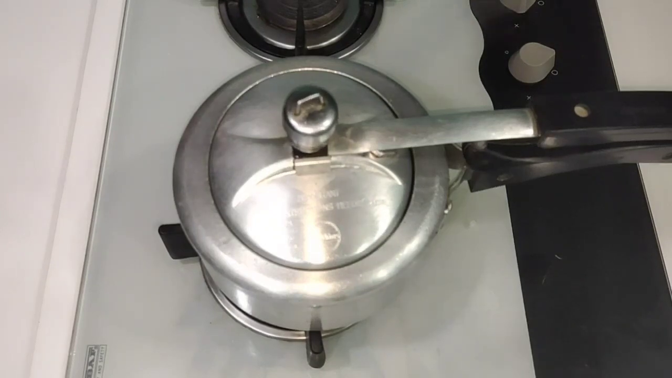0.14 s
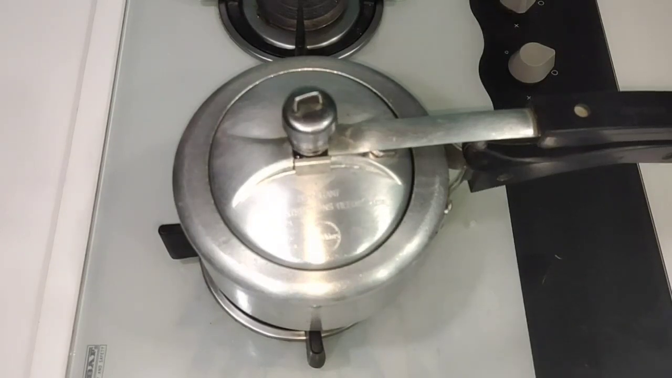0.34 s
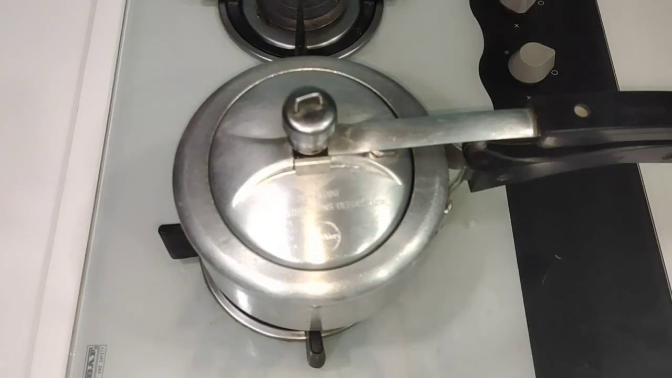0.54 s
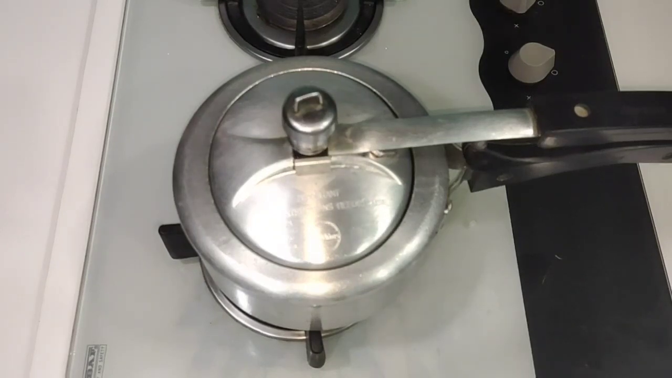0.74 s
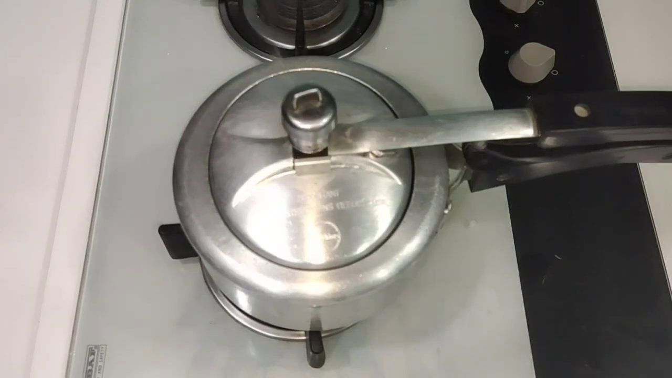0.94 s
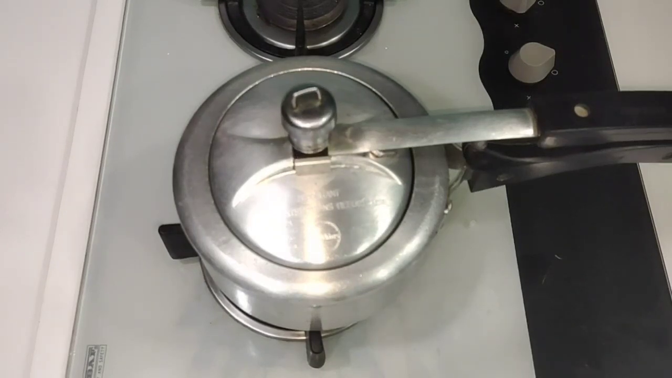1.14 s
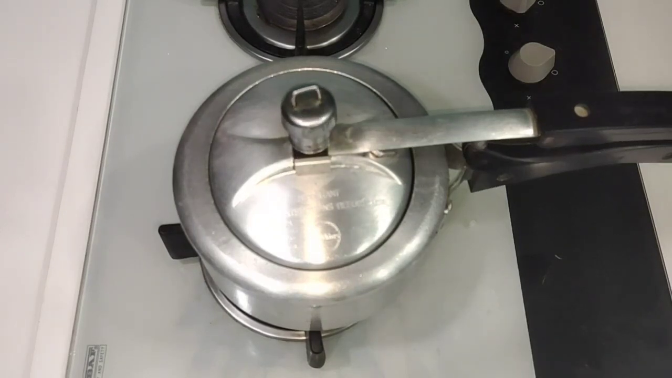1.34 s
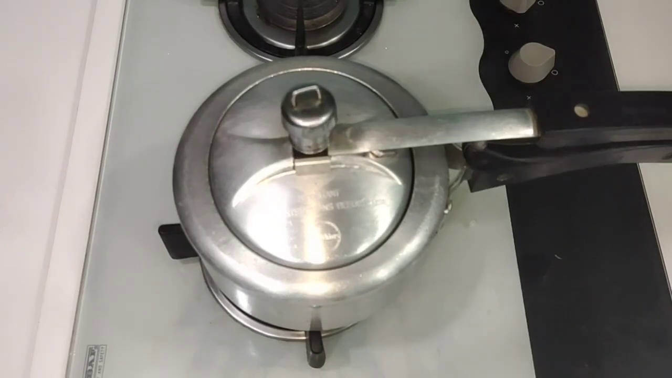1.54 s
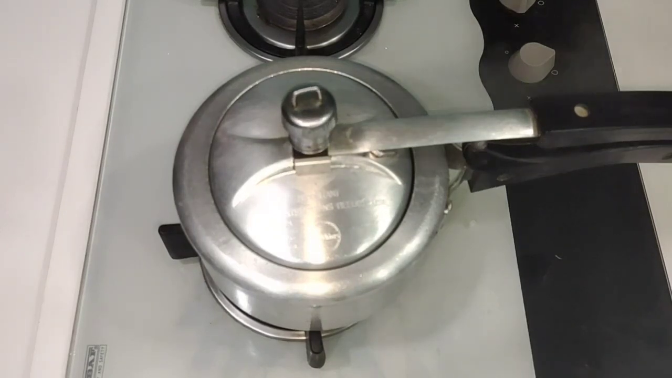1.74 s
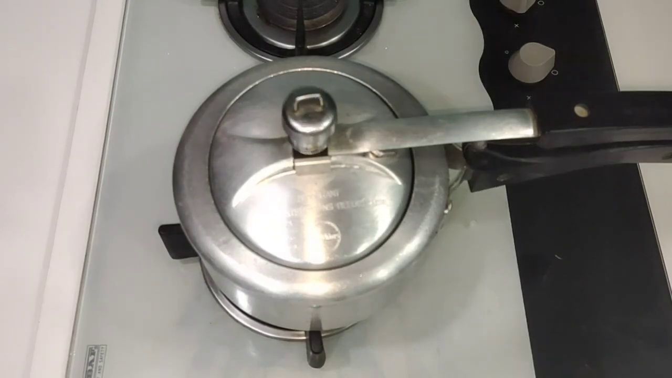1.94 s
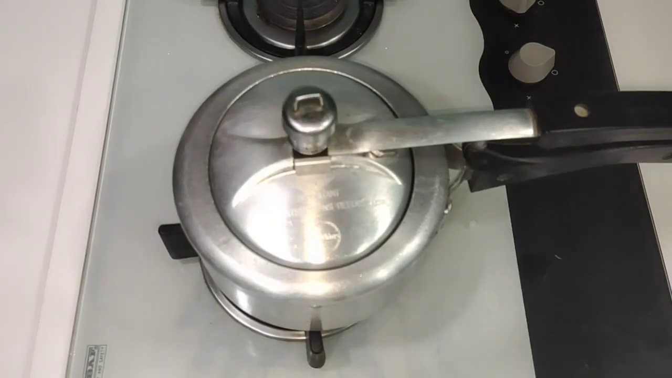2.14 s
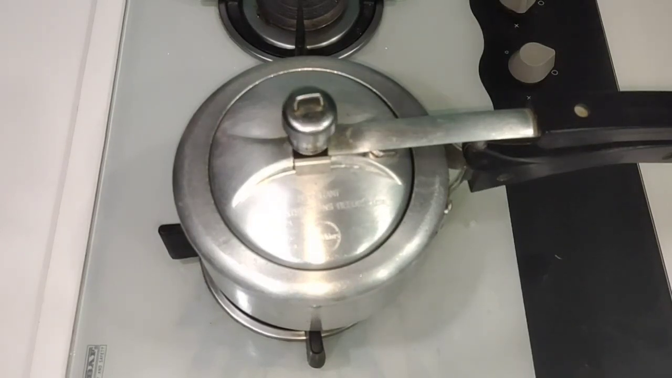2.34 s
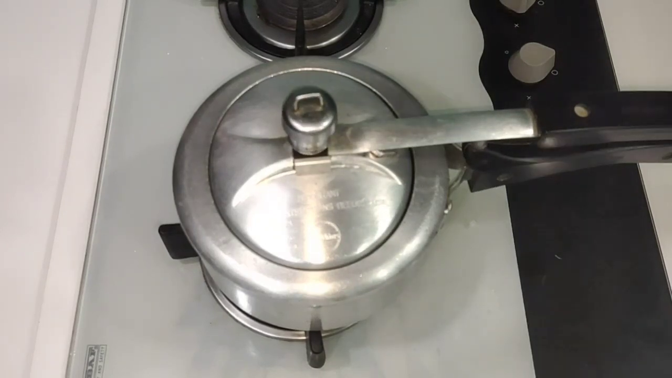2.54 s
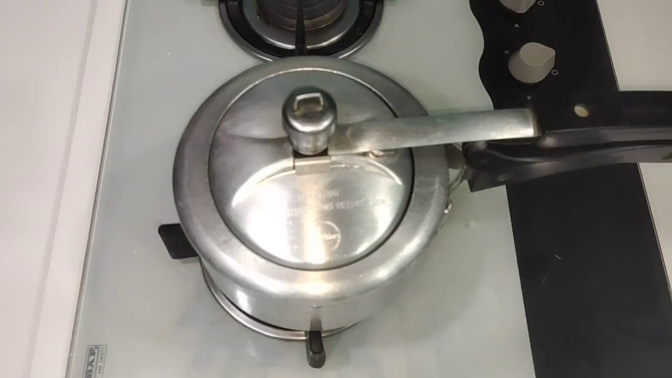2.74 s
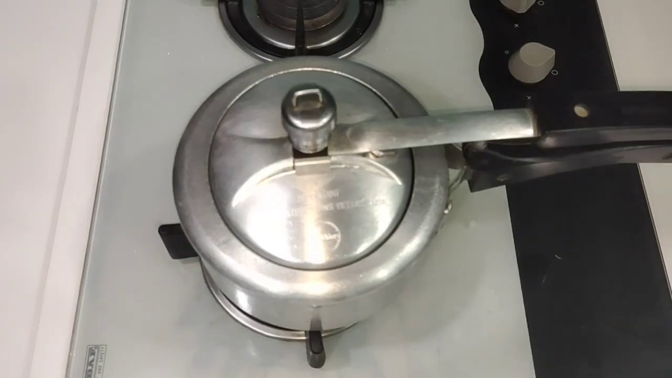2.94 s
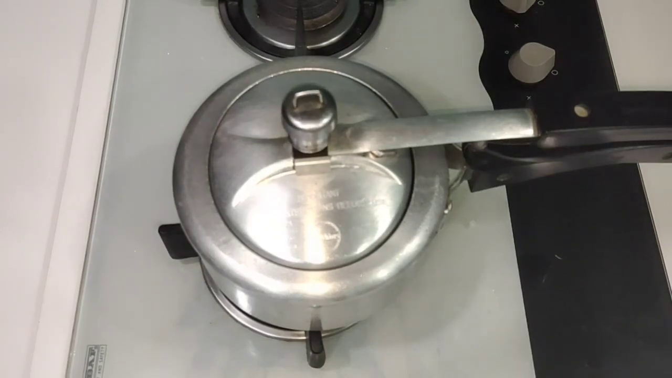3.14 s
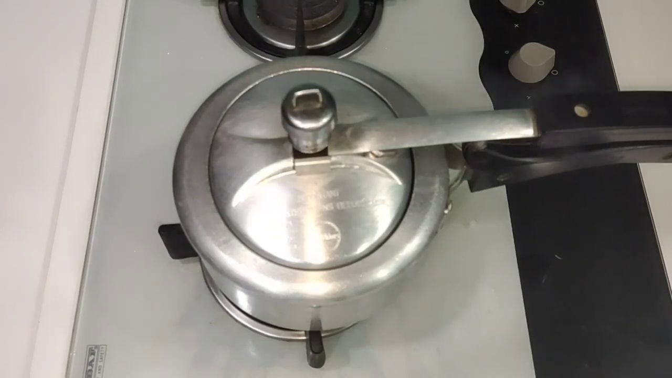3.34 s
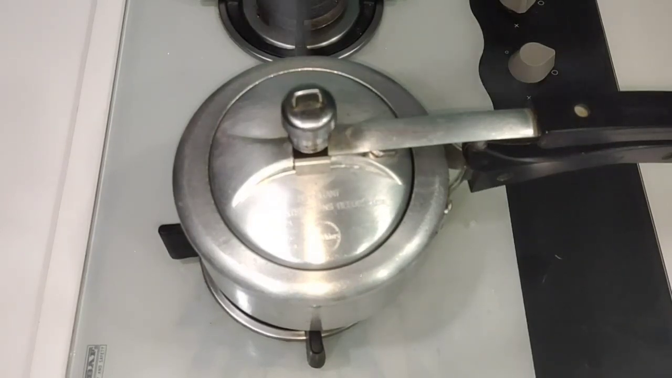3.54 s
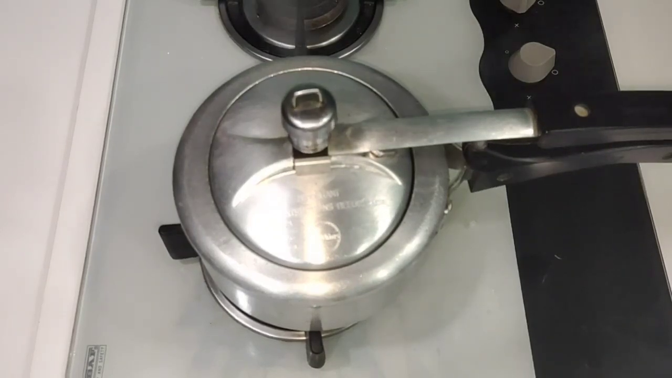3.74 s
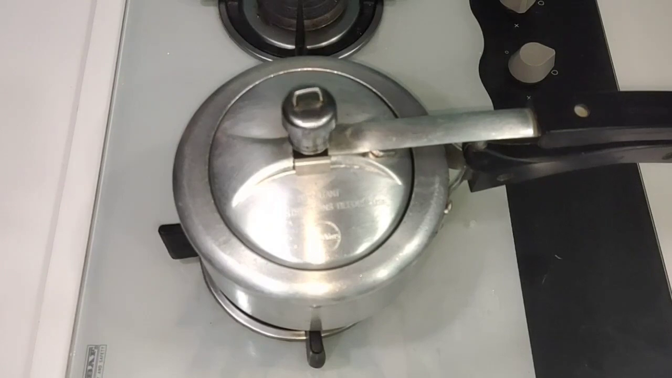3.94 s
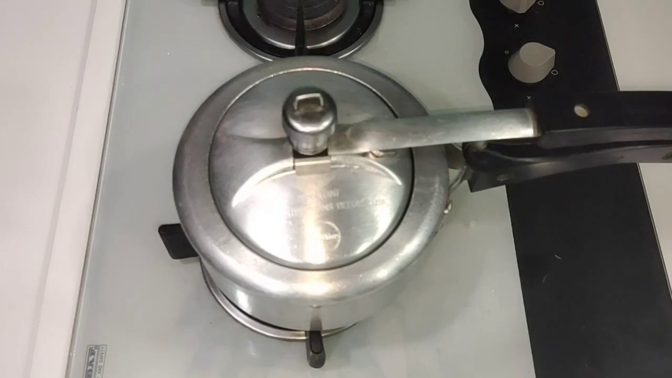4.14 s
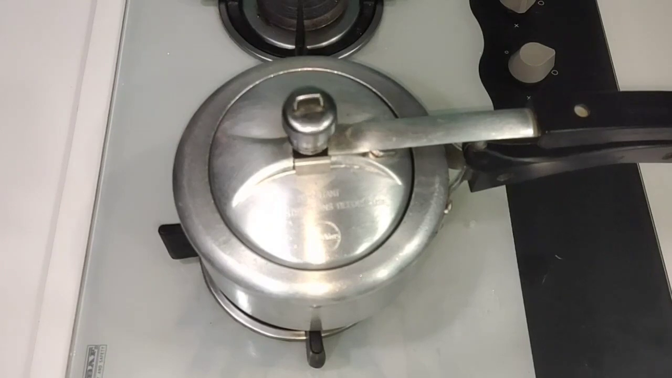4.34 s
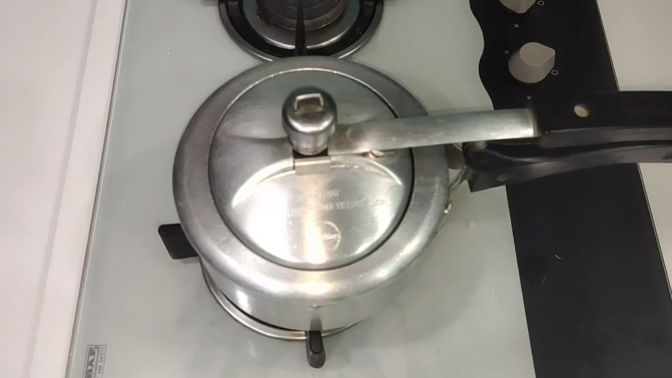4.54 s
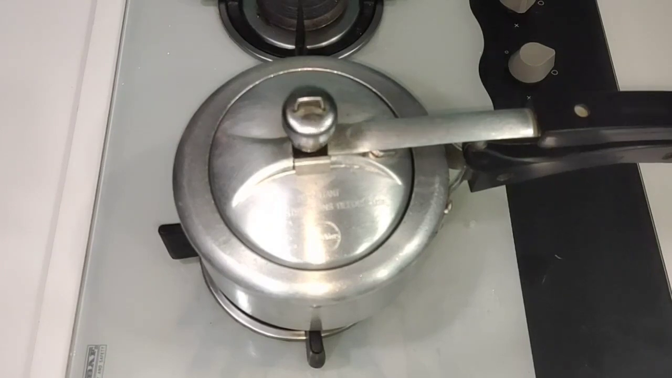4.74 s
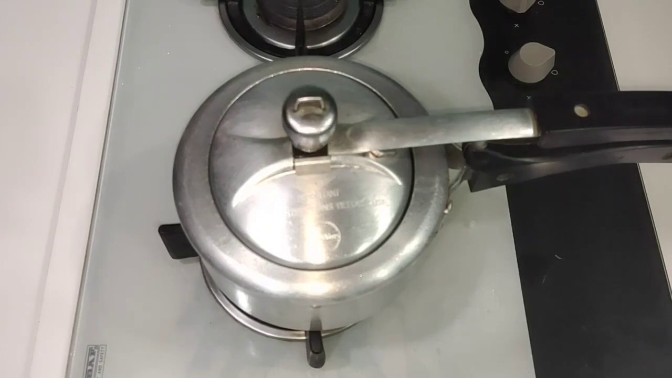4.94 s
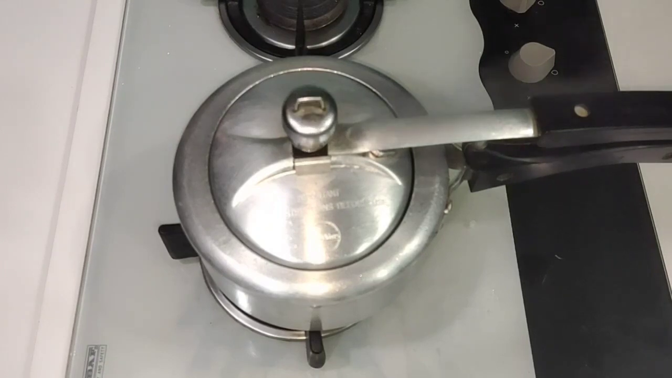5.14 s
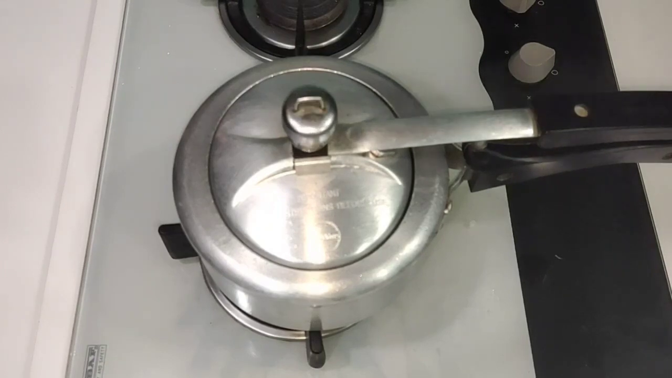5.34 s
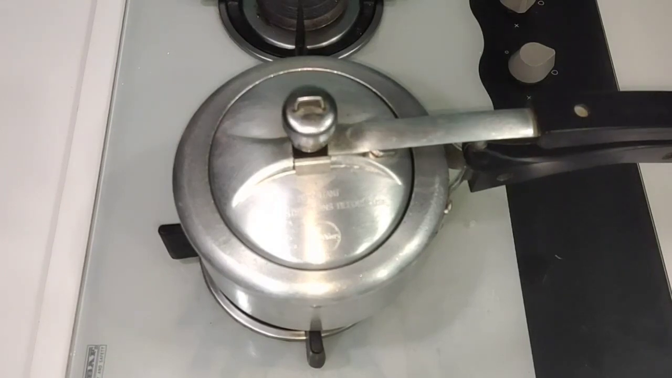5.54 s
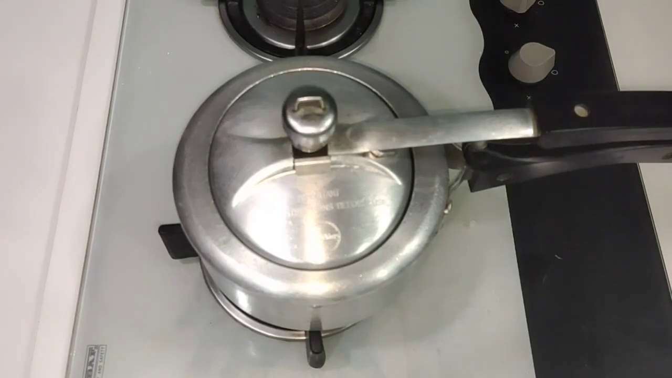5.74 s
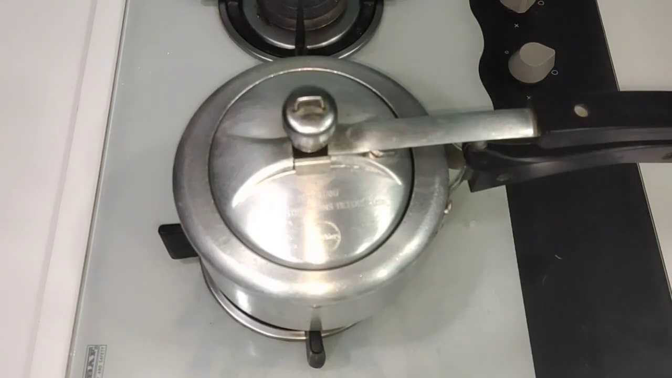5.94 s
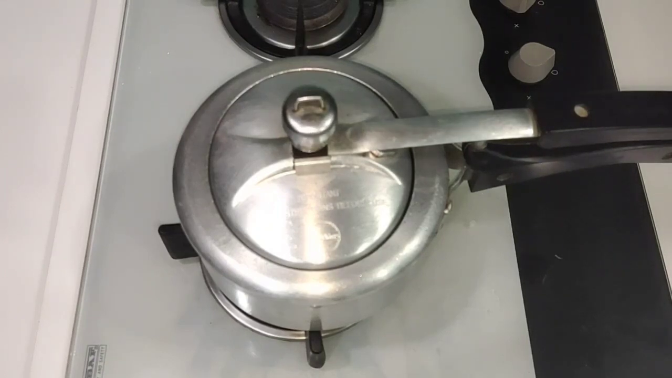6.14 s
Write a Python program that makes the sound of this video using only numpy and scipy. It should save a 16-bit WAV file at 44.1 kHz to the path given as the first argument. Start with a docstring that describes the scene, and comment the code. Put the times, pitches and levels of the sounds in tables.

```python
"""Steam is already roaring from a pressure cooker on a gas hob: the first of four blows, the last still going at the end.
Each blow is shaped noise that swells as the weight lifts and fades as it sinks; the weight clacks as struck resonances.
The jet batters two microphone ports close above the lid, each with its own random pressure cusps and lone pops.
In the pauses the valve leaks faintly and collapsing bubbles thump the pot, as clicks and noise through its resonances.
Wet spits, a wandering low drone, the burner's soft rush and a tiled kitchen's echo fill in the scene."""
import sys
import numpy as np
from scipy import signal
from scipy.fft import rfft, irfft, next_fast_len
from scipy.io import wavfile
from scipy.ndimage import uniform_filter1d, map_coordinates

SR = 44100
rng = np.random.default_rng(int(sys.argv[2]) if len(sys.argv) > 2 else 0)


def unload_wav(signal):
    """Save mono or channel-first audio to the path in sys.argv[1] as 16-bit WAV at rate SR, clipped to [-1, 1]."""
    wavfile.write(
        sys.argv[1],
        SR,
        np.round(np.clip(np.atleast_2d(signal).T, -1, 1) * 32767).astype(np.int16),
    )


N = 277521  # samples

# All table levels are relative: each layer has its own fader.
# the valve's blows: crack_s (seal), lift_s (weight), sink_s (starts), shut_s (duration), rise_s,
# level_db, leak_db (before the blow), sharpness (of shutting, 1 = evenly)
VALVE_BLOWS = [(-0.6, -0.5, 0.275, 0.365, 0.1, -22, -74, 1.9),
               (0.83, 0.915, 1.815, 0.52, 0.068, -21.1, -74, 1.72),
               (2.63, 2.865, 4.02, 0.465, 0.055, -22.6, -62, 1.72),
               (4.693, 4.693, 6.48, 0.45, 0.0057, -21.2, -63.5, 1.72)]
# colour of the hiss at each port: pitch_hz, left_db, right_db
HISS_COLOUR = [(50, -29.5, -40.5), (298, -16, -12.5), (903, -16, -14), (1820, -11.3, -11),
               (3000, -2.5, -3.5), (4220, -4, -4), (5070, -5, -7.5), (6940, -1.3, -5), (7800, 2.5, -4.5),
               (8680, -4, 0.5), (10030, -8, -6.5), (11240, -13.5, -11), (12900, -9, -8.5),
               (14260, -5.5, -5.5)]
# hiss straight from the gap, against 0 dB off the steel around it: pitch_hz, level_db
DIRECT_HISS = [(3000, -20.5), (5400, -0.5), (7500, -7), (10500, -2), (13000, -1.5), (15000, -4)]
# treble of the hiss over its body: time_s, level_db
HISS_BRIGHTNESS = [(0.1, 0.5), (0.4, -1.5), (0.6, -4.5), (0.9, 2), (1.08, 2), (1.3, -2), (1.8, -1.5),
                   (2.1, -1.5), (2.5, -1), (2.7, 1), (2.87, 1.5), (3.15, 4.5), (3.45, 2), (3.75, 1.5),
                   (4.1, -0.5), (4.5, -3), (4.78, 4.5), (5.05, -0.5), (6.2, 1)]
# resonances of the hollow weight: pitch_hz, width_hz, level_db
WEIGHT_HOLLOW = [(420, 220, -4), (1000, 240, 0), (1800, 700, -4.5), (3100, 1100, -2.5)]
# the swaying jet sweeps over a port: port, start_s, end_s, level_db, eddy_speed (1 = usual)
JET_GUSTS = [("right", -0.2, 0.342, -15.1, 1.3), ("left", -0.03, 0.07, -24, 1.0),
             ("left", 0.07, 0.18, -20, 1.4), ("left", 0.2, 0.3, -22, 0.97),
             ("right", 1.046, 1.12, -21, 1.3), ("right", 1.075, 1.23, -16, 1.12),
             ("left", 1.1, 1.21, -19, 1.1), ("left", 1.18, 1.3, -26, 0.9), ("left", 1.27, 1.44, -14.5, 1.7),
             ("left", 1.39, 1.63, -16.5, 1.2), ("right", 1.19, 1.58, -15.5, 1.64),
             ("left", 1.58, 1.78, -17.5, 1.5), ("left", 1.73, 1.92, -18.5, 1.4),
             ("right", 1.53, 1.945, -14.5, 1.9), ("right", 2.975, 3.04, -24, 0.95),
             ("right", 3.01, 3.125, -18.5, 0.99), ("left", 3.045, 3.1, -24, 0.9),
             ("left", 3.14, 3.255, -26, 0.7), ("left", 3.28, 3.355, -26, 0.6),
             ("right", 3.09, 3.3, -25, 0.75), ("right", 3.255, 3.37, -15.5, 1.15),
             ("right", 3.335, 3.48, -15, 0.91), ("right", 3.435, 3.565, -14.5, 2.2),
             ("right", 3.52, 3.625, -19, 0.91), ("right", 3.56, 3.97, -25, 0.82),
             ("right", 3.7, 3.8, -18, 0.99), ("right", 3.92, 4.08, -15, 1.8),
             ("right", 4.02, 4.12, -17.5, 1), ("left", 3.92, 4.02, -23, 1.1),
             ("right", 4.688, 4.745, -18.5, 0.6), ("left", 4.838, 4.99, -13.5, 1.53),
             ("right", 4.845, 5.07, -14.5, 1.12), ("left", 4.95, 5.16, -17, 2.05),
             ("left", 5.15, 5.37, -18, 1.5), ("left", 5.36, 5.48, -17.5, 1.3),
             ("left", 5.45, 5.58, -23, 1.2), ("left", 5.55, 5.69, -15.5, 1.4),
             ("left", 5.67, 5.81, -15.5, 1.3), ("left", 5.79, 5.94, -18, 1.3),
             ("left", 5.9, 6.04, -21, 1.1), ("left", 6.02, 6.11, -18, 1.7), ("left", 6.1, 6.33, -23, 1),
             ("right", 5.03, 6.6, -15.3, 1.5)]
# what a port makes of a pressure kick: pitch_hz, level_db
PORT_COLOUR = [(20, -35.5), (50, -30), (85, -8), (130, -0.7), (400, 0.4), (1200, 3.3), (3000, 6),
               (6000, -6.5), (14000, -13)]
# how hard the water simmers: time_s, level_db
SIMMER_LEVEL = [(0.4, -3), (0.9, 2), (2.2, -1), (2.55, -8), (2.8, 0.5), (4.15, 2.5), (4.65, -11)]
# big bubbles collapsing in the pot: start_s, level_db
BIG_BUBBLES = [(0.525, -43), (0.56, -40), (0.623, -38), (0.683, -39.5), (0.716, -41), (0.735, -44),
               (0.8, -42.5), (0.866, -35), (2.03, -36.5), (2.144, -38), (2.204, -39), (2.238, -36),
               (2.356, -37.5), (2.472, -42), (2.567, -44), (2.616, -45), (2.739, -35), (2.753, -36),
               (4.254, -40), (4.371, -42), (4.47, -44), (4.575, -46)]
# resonances of pot and lid: pitch_hz, width_hz, level_db
POT_MODES = [(115, 18, -1), (154, 24, -2.5), (192, 49, -5), (302, 120, -11.5), (560, 190, -17),
             (876, 78, -19)]
# what the pot's wall lets out: pitch_hz, level_db
POT_WALL = [(30, -33), (62, -17.5), (95, 1.5), (900, -1), (1400, -16.5), (4000, -33.5)]
# colour of the gas flame: pitch_hz, level_db
FLAME_COLOUR = [(25, -21), (60, -11.5), (130, 15), (300, -2.5), (800, -18.5), (1400, -30), (5000, -25),
                (15000, -17)]
# decay of the kitchen echo: pitch_hz, t60_s
KITCHEN_DECAY = [(150, 0.45), (1000, 0.51), (3000, 0.46), (8000, 0.32), (15000, 0.04)]
# colour of the kitchen echo: pitch_hz, level_db
ECHO_COLOUR = [(100, -3), (1000, 8), (2200, 5), (4000, 0), (8000, -9), (15000, -17.5)]
# the weight knocks on the vent as it jumps and settles: start_s, level_db
WEIGHT_KNOCKS = [(0.357, -23), (0.395, -24.5), (0.883, -36.5), (1.961, -22), (2.113, -34.5), (2.841, -21),
                 (4.127, -28)]
# wet steam spits as the weight jumps: start_s, level_db, pitch_ratio (1 = the vent's own)
WET_SPITS = [(0.879, -32, 0.83), (2.641, -44, 1.05), (2.832, -29, 0.97)]
# resonances of the vent under its weight: pitch_hz, width_hz, level_db
VENT_MODES = [(115, 90, 3), (420, 240, -4), (690, 180, -4.5), (850, 110, 0), (1100, 200, -14.5),
              (1930, 410, -21), (3314, 900, -10.5)]
# single strong eddies: port, start_s, level_db
LONE_POPS = [("right", 1.068, -10.5), ("left", 1.357, -4.5), ("left", 1.5, -4.5), ("right", 1.929, -7),
             ("right", 2.993, -14), ("right", 3.029, -10), ("right", 3.039, -9), ("right", 3.046, -6),
             ("left", 3.066, -8), ("right", 3.078, -7.5), ("right", 3.089, -12), ("right", 3.172, -7.5),
             ("left", 3.21, -5), ("right", 3.233, -8), ("right", 3.25, -6), ("right", 3.276, -3),
             ("right", 3.68, -9), ("right", 3.733, -5), ("right", 3.81, -7), ("right", 3.867, -12),
             ("right", 3.885, -6), ("right", 3.894, -5), ("right", 3.919, -8), ("right", 3.955, -3),
             ("right", 4.702, -14), ("right", 4.741, -14), ("left", 4.824, -5.5), ("left", 4.851, -5.5),
             ("left", 5.18, -5.5), ("left", 5.392, -5.5), ("left", 5.444, -4), ("left", 5.589, -5.5),
             ("right", 5.634, -5)]

SEEP_DB, CRACK_S = -45, 0.0087  # flow through the cracked seal before the lift, and its fade-in
SHUT_DB = 40.5  # fall of the hiss by the end of the shutting time
SIZZLE_HZ, SIZZLE_SHUT_DB = 10000, 54  # the top of the hiss falls further: the slowing jet grows dull
TILT_HZ = 4520  # the hiss brightens and darkens about this point
GUST_ATTACK_S, GUST_RELEASE_S = 0.03, 0.028
GUST_EDGE_DB = 3.5  # a gust is this much weaker at its ends than in its middle
TOP_HZ = 15800  # band limit of the whole mix


def amp(db):
    """Decibels to gain."""
    return 10 ** (np.asarray(db) / 20)


def unit(x):
    """Bring x to rms 1."""
    return x / np.sqrt(np.mean(x ** 2) + 1e-20)


def along(points, hz, axis=1):
    """Read one column of a (pitch_hz, value, ..) table on a log pitch axis."""
    table = np.transpose(points)
    return np.interp(np.log(hz + 1), np.log(table[0] + 1), table[axis])


def curve(rows):
    """Join (time_s, value) rows into one value per sample."""
    return np.interp(np.arange(N) / SR, *np.transpose(rows))


def wobble(rate):
    """A smooth random curve with rate knots a second."""
    knots = rng.standard_normal(int(N * rate / SR) + 4)
    return map_coordinates(knots, [np.arange(N) * rate / SR])


def filtered(x, response):
    """Multiply the spectrum of x by a complex response of frequency."""
    m = 2 * next_fast_len(N // 2 + SR // 2)
    return irfft(rfft(x, m) * response(np.fft.rfftfreq(m, 1 / SR)), m)[..., :N]


def causal(gain):
    """Minimum-phase response with this gain, so that nothing sounds ahead of its cause."""
    cepstrum = irfft(np.log(gain))
    half = len(cepstrum) // 2
    fold = np.r_[1, np.full(half - 1, 2), 1, np.zeros(half - 1)]
    return np.exp(rfft(cepstrum * fold))


def ring(x, modes):
    """Excite parallel resonances (pitch_hz, width_hz, level_db) with x."""
    def response(f):
        return sum(amp(db) * 1j * f * w / (c * c - f * f + 1j * f * w) for c, w, db in modes)
    return filtered(x, response)


def jet_db(shut_db):
    """Steam flow in dB: a faint leak, a seep as the seal cracks, a full blow as the weight lifts, a fade as it sinks."""
    t = np.arange(N) / SR
    flow, last_sink = np.zeros(N), -1
    for crack, lift, sink, shut_s, rise_s, db, leak_db, sharpness in VALVE_BLOWS:
        opening = (SEEP_DB - db) * np.exp(-np.maximum(t - lift, 0) / rise_s)
        closing = shut_db * (np.maximum(t - sink, 0) / shut_s) ** sharpness
        flow += amp(db + opening - closing) * np.clip((t - crack) / CRACK_S, 0, 1)
        flow += amp(leak_db) * (t >= last_sink) * (t < sink)
        last_sink = sink
    return 20 * np.log10(flow + 1e-9)


def near_surfaces(x, share, reach_s, turn_rate, count=60):
    """Lid, hob and wall send back early copies that comb the sound; the ripples shift as the jet swings round."""
    heard = []
    for _ in range(3):
        delays_s = rng.uniform(reach_s / 10, reach_s, count)
        taps = np.zeros(int(reach_s * SR) + 2)
        taps[(delays_s * SR).astype(int)] = rng.standard_normal(count)
        heard.append(signal.fftconvolve(x, taps / np.linalg.norm(taps))[:N])
    # fade at random between three sets of reflections
    aim = np.array([wobble(turn_rate) for _ in heard])
    reflections = np.sum(aim * heard, axis=0) / np.linalg.norm(aim, axis=0)
    return unit(x + share * reflections)


def patches(x, depth_db):
    """The jet's colour shifts from moment to moment, a little differently in each band."""
    z = signal.stft(x, nperseg=512)[2]
    field = rng.standard_normal(z.shape[1:])
    field = uniform_filter1d(field, size=4, axis=0)  # neighbouring bands
    field = uniform_filter1d(field, size=14, axis=1)  # neighbouring moments
    return signal.istft(z * amp(depth_db * unit(field)), nperseg=512)[1][:, :N]


def hiss(level_db, flutter_db, patchy_db, lag_s):
    """Turbulence at the valve gap: its direct part reaches the left port late; the dancing weight makes it flutter."""
    def direct_path(hz):
        return amp(along(DIRECT_HISS, hz)) * np.exp(-2j * np.pi * np.outer([lag_s, 0], hz))

    direct = filtered(rng.standard_normal(N), direct_path)
    scattered = rng.standard_normal((2, N))
    heard = np.array([near_surfaces(port, share=0.7, reach_s=.016, turn_rate=3) for port in direct + scattered])
    ports = filtered(heard, lambda hz: amp([along(HISS_COLOUR, hz, axis=1), along(HISS_COLOUR, hz, axis=2)]))
    rush = unit(patches(ports, patchy_db))
    # see-saw between body and treble
    low = filtered(rush, lambda hz: 1 / (1 + (hz / TILT_HZ) ** 4))
    tilt_db = curve(HISS_BRIGHTNESS)
    rush = low * amp(-tilt_db / 2) + (rush - low) * amp(tilt_db / 2)
    body = filtered(rush, lambda hz: 1 / (1 + (hz / SIZZLE_HZ) ** 10))
    sizzle = rush - body
    steam = body * amp(jet_db(SHUT_DB)) + sizzle * amp(jet_db(SIZZLE_SHUT_DB))
    return steam * amp(level_db + flutter_db * wobble(35))


def hollow(level_db, shut_db, flutter_db):
    """Steam rushes through the hollow of the rocking weight: a breathy, uneven colour in the hiss."""
    rush = unit(ring(rng.standard_normal((2, N)), WEIGHT_HOLLOW))
    flow_db = jet_db(shut_db) - curve(HISS_BRIGHTNESS)  # recedes as the hiss brightens
    return rush * amp(flow_db + level_db + flutter_db * wobble(55))


def draught(port):
    """Strength and eddy speed of the jet at one port; each gust sets in fast, arches and drops away."""
    t = np.arange(N) / SR
    gusts, speeds = [], []
    for side, start, end, db, speed in JET_GUSTS:
        if side == port:
            gate = np.clip(np.minimum((t - start) / GUST_ATTACK_S, (end - t) / GUST_RELEASE_S), 0, 1)
            arch_db = GUST_EDGE_DB * (2 * np.clip((t - start) / (end - start), 0, 1) - 1) ** 2
            gusts.append(gate * amp(db - arch_db))
            speeds.append(speed)
    gusts = np.array(gusts) + 1e-9
    return gusts.max(axis=0), np.dot(speeds, gusts) / gusts.sum(axis=0)


def buffet(port, level_db, sway_db, surge_db, full_rate, crowding, width_s, spread, size_db, heft, fray, wake_s):
    """Eddies hit a port as single cusps of pressure: sparse at the jet's edge, a dense rattle in its core."""
    strength, speed = draught(port)
    strength = strength * amp(sway_db * wobble(16) + surge_db * wobble(60))
    rate = full_rate * (strength / amp(-17)) ** crowding + 15  # eddies a second
    passed = np.cumsum(rate) / SR
    count = int(passed[-1])
    timing, bulkiness, direction, loudness = rng.uniform(-1, 1, (4, count))
    at = np.clip(np.searchsorted(passed, np.arange(count) + .5 + 2 * timing), 0, N - 1)
    bulk = np.exp(spread * bulkiness)
    life_s = width_s * bulk / speed[at]  # small or fast eddies pass quickly
    size = np.sign(direction) * amp(size_db * loudness) * bulk ** heft * np.sqrt(speed / rate)[at]
    offsets = np.arange(-SR // 200, SR // 200)
    cusps = size[:, None] * np.exp(-abs(offsets) / SR / life_s[:, None])
    where = np.clip(at[:, None] + offsets, 0, N - 1).ravel()
    pressure = np.bincount(where, cusps.ravel(), N)
    # every eddy trails a wake of finer turbulence
    stir = np.bincount(where, abs(cusps).ravel(), N)
    wake = filtered(stir, lambda hz: 1 / (1 + 2j * np.pi * hz * wake_s))
    pressure = pressure + fray * wake * rng.standard_normal(N)
    kicks = unit(filtered(pressure, lambda hz: causal(amp(along(PORT_COLOUR, hz)))))
    return kicks * strength * amp(level_db)


def drone(level_db, pitch_hz, wander_hz):
    """The air in the pot hums on under the boil, its pitch wandering."""
    phase = 2 * np.pi * np.cumsum(pitch_hz + wander_hz * wobble(40)) / SR
    return amp(level_db) * np.sin(phase)


def boil(big_db, simmer_db, simmer_hz, rebound_db, rebound_t60_s, thud_s):
    """Collapsing bubbles knock the pot: big ones, each with a short churn, over a dark simmer that swells and sinks."""
    simmer = filtered(rng.standard_normal(N), lambda hz: 1 / np.sqrt(1 + (hz / simmer_hz) ** 2))
    knocks = simmer * amp(curve(SIMMER_LEVEL) + simmer_db)
    t = np.arange(SR // 10) / SR
    for start_s, db in BIG_BUBBLES:
        churn = amp(rebound_db - 60 * t / rebound_t60_s) * rng.standard_normal(len(t))
        thud = np.exp(-t / thud_s) / (thud_s * SR)
        knocks[round(start_s * SR):][:len(t)] += amp(db + big_db) * (churn + thud)
    return filtered(ring(knocks, POT_MODES), lambda hz: causal(amp(along(POT_WALL, hz))))


def flame(level_db):
    """The burner's soft rush: shaped noise, nearly the same at both ports."""
    noise = rng.standard_normal(N) + 0.16 * rng.standard_normal((2, N))
    return amp(level_db) * unit(filtered(noise, lambda hz: amp(along(FLAME_COLOUR, hz))))


def kitchen(x):
    """Tiled walls answer with a decaying noise tail; the treble dies first."""
    hz, t, z = signal.stft(rng.standard_normal((2, SR * 3 // 4)), SR, nperseg=256)
    decay = amp(-60 * t / along(KITCHEN_DECAY, hz)[:, None])
    tail = signal.istft(z * decay, SR, nperseg=256)[1]
    echo = signal.fftconvolve(x, tail / np.linalg.norm(tail[0]), axes=1)[:, :N]
    return filtered(echo, lambda hz: amp(along(ECHO_COLOUR, hz)))


def weight(level_db):
    """The hollow steel weight strikes the vent: each blow is one dead clack."""
    strikes = np.zeros(N)
    for start_s, db in WEIGHT_KNOCKS:
        strikes[round(start_s * SR)] = amp(db + level_db)
    return ring(strikes, WEIGHT_HOLLOW)


def spits(level_db, t60_s, rough_db):
    """Condensate is blown through the vent in a short, broken gargle, each at its own pitch."""
    t = np.arange(N) / SR
    gargles = np.zeros((2, N))
    for start_s, db, pitch in WET_SPITS:
        modes = [(hz * pitch, width, mode_db) for hz, width, mode_db in VENT_MODES]
        spray = rng.standard_normal((2, N))
        spray = unit(ring(spray + spray[::-1] / 2, modes))  # ports partly alike
        gargles += spray * amp(db - 60 * np.maximum(t - start_s, 0) / t60_s) * (t >= start_s)
    return gargles * amp(level_db + rough_db * wobble(150))


def pops(port, level_db, width_s, rebound, rebound_s):
    """A lone eddy is one sharp cusp of pressure with a softer swing back."""
    t = np.arange(N) / SR
    pressure = np.zeros(N)
    for side, start_s, db in LONE_POPS:
        if side == port:
            near = slice(int((start_s - .01) * SR), int((start_s + .01) * SR))
            since = t[near] - start_s
            life_s = width_s * np.exp(.2 * rng.standard_normal())
            cusp = np.exp(-abs(since) / life_s)
            swing_back = rebound * np.exp(-abs(since - rebound_s) / (2 * life_s))
            pressure[near] += rng.choice([-1, 1]) * amp(db + level_db) * (cusp - swing_back)
    return filtered(pressure, lambda hz: causal(amp(along(PORT_COLOUR, hz))))


def scene():
    """Valve sounds ring in the kitchen; pot and flame stay dry, as does the buffeting that arises at the ports."""
    steam = hiss(level_db=1.76, flutter_db=.6, patchy_db=2.0, lag_s=.00009)
    steam = steam + hollow(level_db=-16, shut_db=45.5, flutter_db=2.5)
    left = buffet("left", level_db=-2.5, sway_db=1.42, surge_db=1.32, full_rate=380, crowding=1.1,
                  width_s=0.00046, spread=1, size_db=6.0, heft=.2, fray=0.2, wake_s=.001)
    right = buffet("right", level_db=0.5, sway_db=0.59, surge_db=0.89, full_rate=520, crowding=1.3,
                   width_s=0.00027, spread=0.93, size_db=5.0, heft=.2, fray=0.33, wake_s=0.0012)
    pot = drone(level_db=-62.5, pitch_hz=135, wander_hz=16)
    pot = pot + boil(big_db=39, simmer_db=-36, simmer_hz=250, rebound_db=-28, rebound_t60_s=0.15, thud_s=.0006)
    burner = flame(level_db=-63.5)
    valve = steam + weight(level_db=22) + spits(level_db=-5.5, t60_s=0.35, rough_db=3)
    lone = np.array([pops(port, level_db=1, width_s=0.00043, rebound=0.4, rebound_s=.0013)
                     for port in ("left", "right")])
    return valve + amp(-8.5) * kitchen(valve) + np.array([left, right]) + lone + pot + burner


def record(dry):
    """Round off the highest peaks, then keep nothing above the band limit."""
    rounded = dry / (1 + (dry / .95) ** 6) ** (1 / 6)
    return filtered(rounded, lambda hz: hz < TOP_HZ)


dry = scene()
out = record(dry)
unload_wav(out)
```